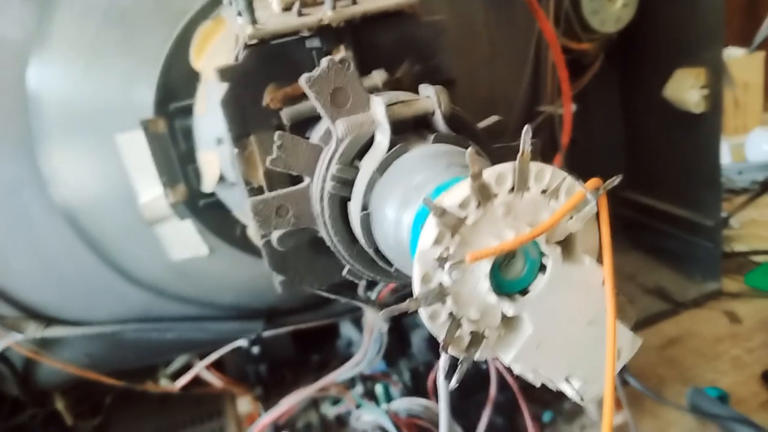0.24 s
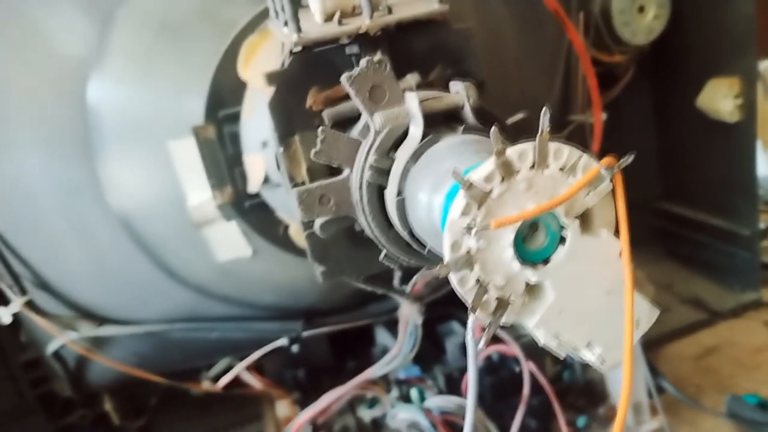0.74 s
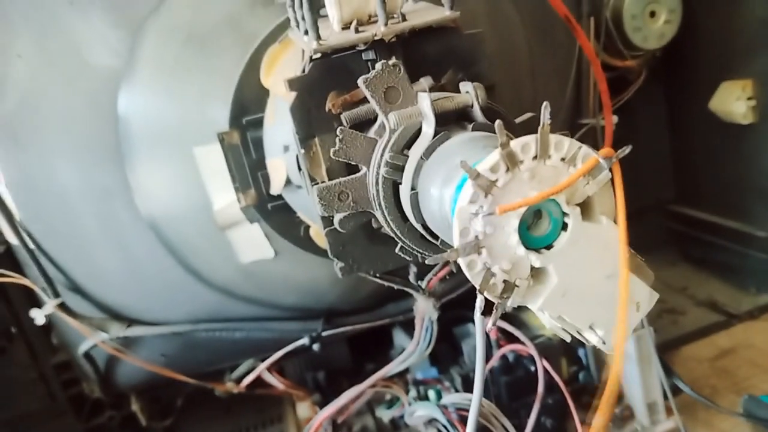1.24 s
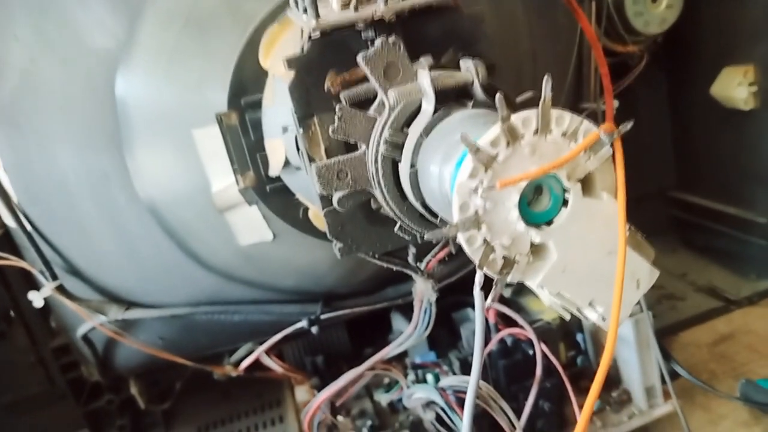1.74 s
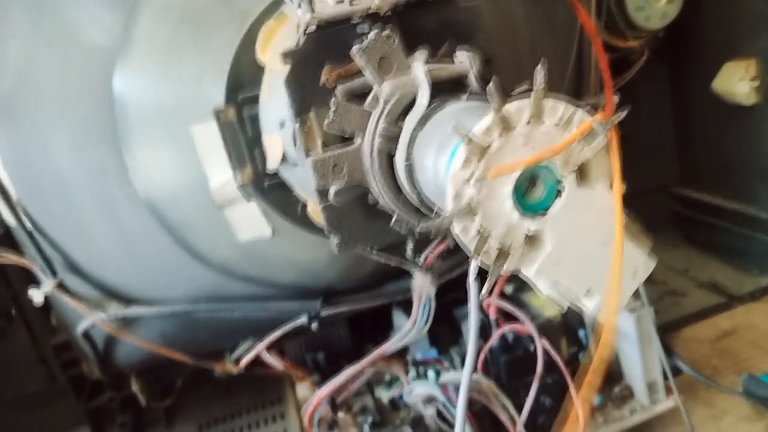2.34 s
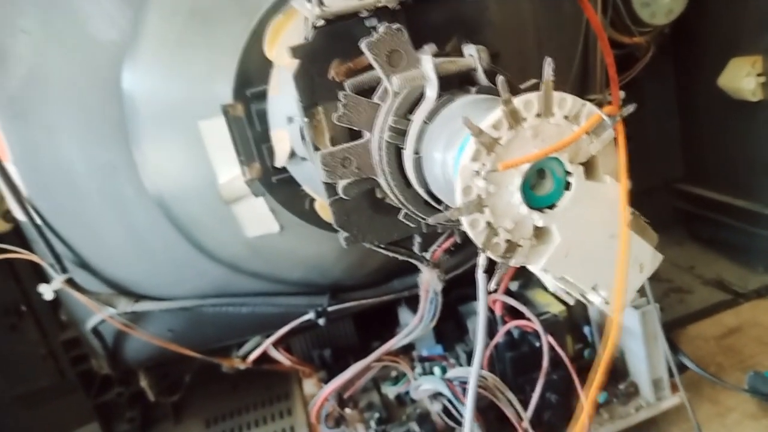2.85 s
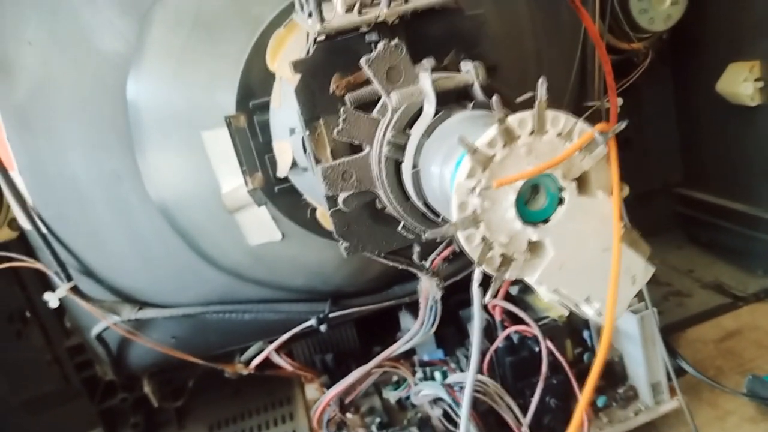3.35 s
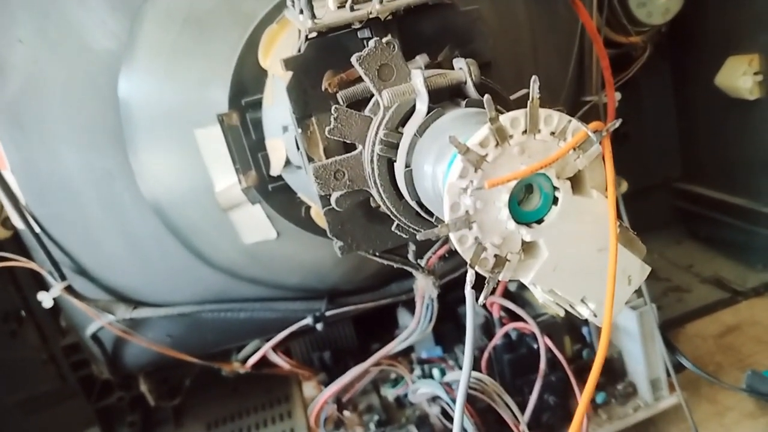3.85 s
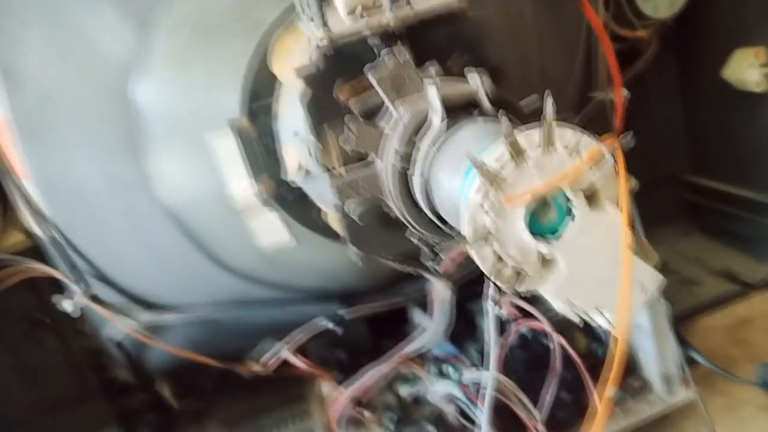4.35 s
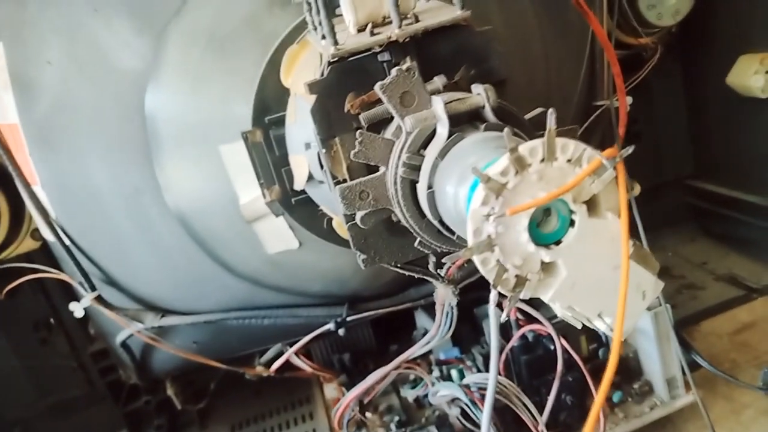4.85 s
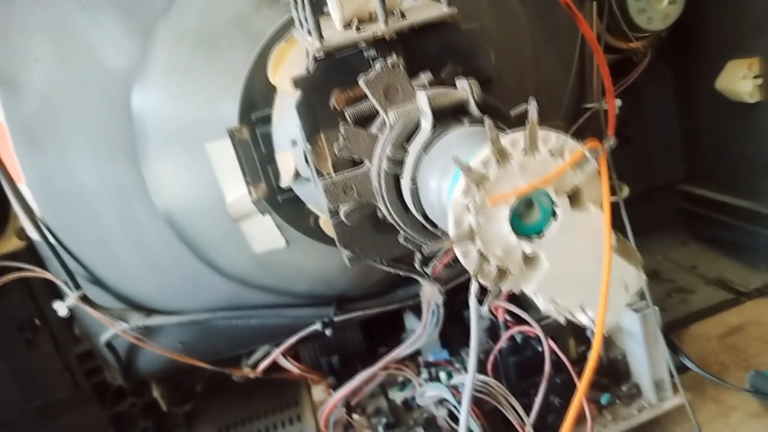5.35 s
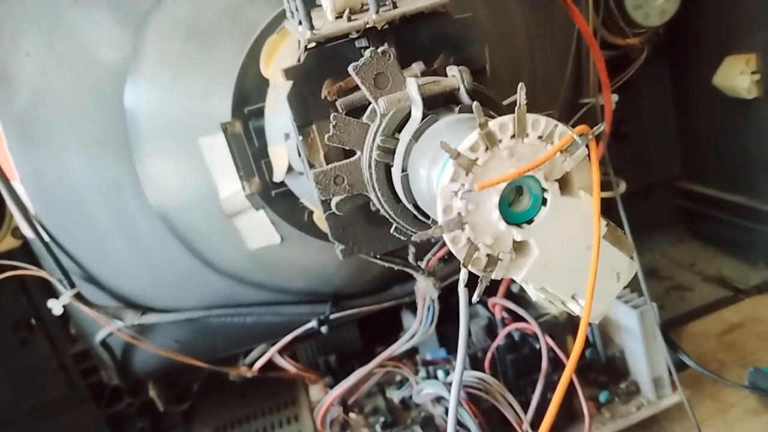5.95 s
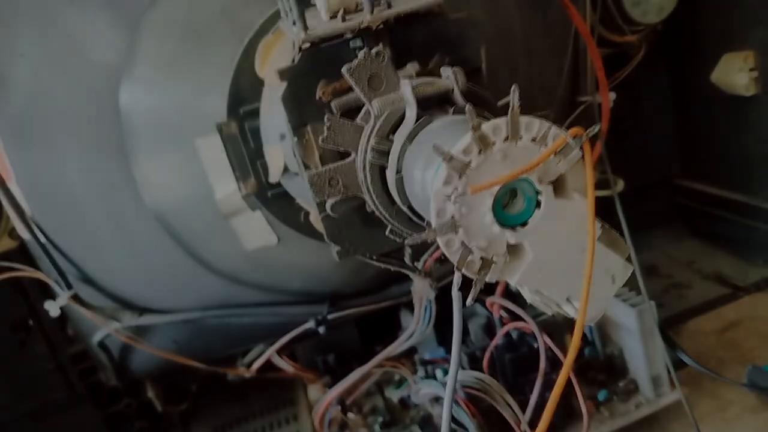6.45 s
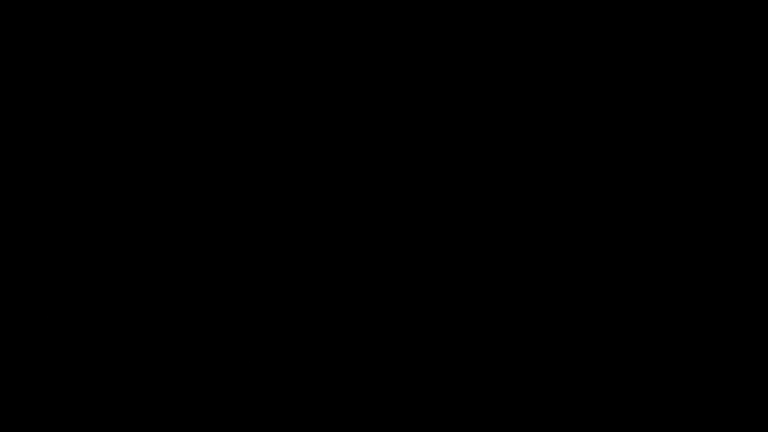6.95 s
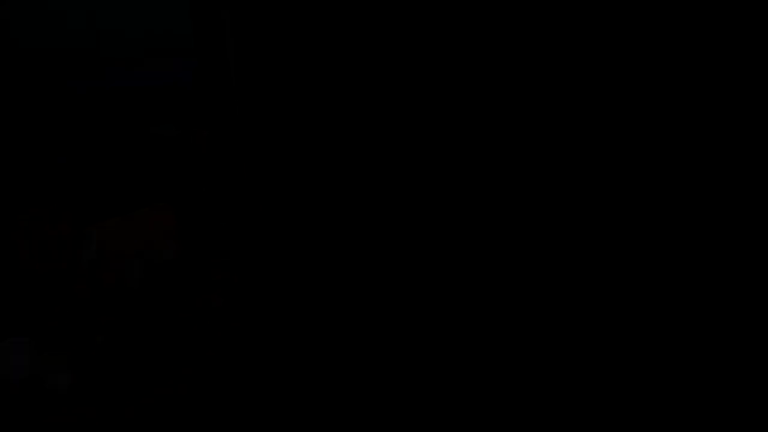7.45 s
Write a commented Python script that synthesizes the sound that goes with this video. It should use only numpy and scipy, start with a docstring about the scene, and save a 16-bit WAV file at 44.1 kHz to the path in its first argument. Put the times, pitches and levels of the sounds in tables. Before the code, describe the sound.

Sharp, loud electric sparks snap about seven times a second in a small workshop, pausing twice for switch clicks, then fade out.

```python
"""Sharp electric snaps, about seven a second, close to a phone: an electric fly swatter sparks at a picture tube's neck.
Each spark cracks in the tube socket with a dull pop of heated air, scatters off the chassis and dies away in a small
workshop; its discharge also jolts the microphone input into a low thump. Twice the swatter's button is let go and
pressed again. Soft bumps, a faint falling whistle, room noise and steady sines lie beneath. The end fades out."""
import sys
import numpy as np
from scipy import signal
from scipy.fft import rfft, irfft, next_fast_len
from scipy.io import wavfile

SR = 44100
rng = np.random.default_rng(int(sys.argv[2]) if len(sys.argv) > 2 else 0)


def inscribe(sig):
    """Save sig as 16-bit PCM at rate SR to the path in sys.argv[1].

    A 1-D sig is mono; a 2-D sig holds one channel per row.
    Samples are clipped to [-1, 1] before scaling.
    """
    pcm = np.round(np.clip(np.atleast_2d(sig).T, -1, 1) * 32767)
    wavfile.write(sys.argv[1], SR, pcm.astype(np.int16))


N = 339570  # length in samples

# The sparks. Each row: start in seconds, crack level in dB, level of the heated air's pop in dB,
# signed size of the electrical jolt to the microphone input (no unit).
SPARKS = [(0.1012, 0.7, 19, -0.045), (0.2566, .6, 16.5, 0.57), (0.3714, 0.2, 20, -.05),
          (0.5193, 1.3, 20.5, -.18), (0.6331, 1, 19.5, -.13), (0.768, -0.5, 13.5, -.11),
          (.9, 0.5, 15, -0.046), (1.2918, .7, 14, 0.029), (1.4148, 2.4, 8.5, 0.076),
          (1.5385, 1, 14.5, -0.066), (1.678, 2, 20.5, -.02), (1.82, 2.5, 22.5, 0.11),
          (1.9675, 0.7, 19, -.06), (2.1025, 0.9, 16, -0.05), (2.2306, -0.3, 6.5, -.02),
          (2.8287, 1, 16, -0.044), (2.9819, 1.5, 12.5, .03), (3.106, 0.8, -15.5, .36),
          (3.2143, -1, 10, -.01), (3.3447, -0.8, 12, -.06), (3.4871, 1, 19, -0.097),
          (3.635, -1.4, 16, -0.36), (3.7939, 0, 9, .11), (3.9093, 0.4, 14.5, -.07), (4.0674, 0, 7, .26),
          (4.2175, 0.1, -20, 0.029), (4.3394, 1.3, 17.5, .99), (4.4765, -1.2, 11, -.15),
          (4.6228, 1.3, 18.5, -.22), (4.7544, -1.8, 5, -0.052), (4.896, 0.5, 18, 0.091),
          (5.0434, 1.8, 11, 0.3), (5.2112, 1.6, 7, -.07), (5.3541, 2, 16.5, .33), (5.508, -0.5, 11.5, -.18),
          (5.6421, -0.7, 14.5, -0.42), (5.8186, 0.2, 10, .43), (5.9883, 0.5, 20, -0.55),
          (6.1571, -.3, 12.5, .64), (6.3038, 1, 19.5, -.33), (6.488, -1.1, 12, .41),
          (6.6863, 0.5, 12.5, 0.54), (6.8611, 0.5, 10.5, -.16), (7.0634, 1, -2, 0.22)]


def amp(db):
    """Turn decibels into a gain."""
    return 10 ** (np.asarray(db) / 20)


def unit(x):
    """Scale a sound to rms 1."""
    return x / np.sqrt(np.mean(x ** 2) + 1e-20)


def along(points, hz):
    """Read a curve of (Hz, value) points on a logarithmic frequency axis."""
    f, v = np.transpose(points)
    return np.interp(np.log(hz + 1), np.log(f + 1), v)


def filtered(x, response):
    """Multiply the spectrum of x by a (possibly complex) response of frequency."""
    m = next_fast_len(len(x) + 8192)  # spare room so that ringing does not wrap around
    f = np.fft.rfftfreq(m, 1 / SR)
    return irfft(rfft(x, m) * response(f), m)[:len(x)]


def resonance(f, hz, width_hz):
    """A ringing band-pass that starts no earlier than its input, with gain 1 at its centre."""
    return 1j * f * width_hz / (hz * hz - f * f + 1j * f * width_hz)


def causal(gain):
    """The tightest ringing response that has this gain per frequency: sharp attack, then decay."""
    cepstrum = irfft(np.log(gain + 1e-6))
    half = len(cepstrum) // 2
    # folding the second half onto the first gives the minimum-phase response
    fold = np.r_[1, np.full(half - 1, 2), 1, np.zeros(half - 1)]
    return irfft(np.exp(rfft(cepstrum * fold)))[:half]


def add(track, s, sound):
    """Mix a sound into the track at time s, in seconds."""
    part = track[round(s * SR):][:len(sound)]
    part += sound[:len(part)]


def impulses(times, sizes):
    """One single-sample impulse per event."""
    return np.bincount(np.round(times * SR).astype(int), sizes, N)[:N]


def sparks():
    """The direct sound: a ringing crack, a dull pop, and the thump of a voltage step of either sign."""
    s, _, pop_db, jolt = np.transpose(SPARKS)

    def pop_colour(f):
        return resonance(f, 850, 1600) / (1 + (f / 2000) ** 4)

    def input_coupling(f):
        # turns a voltage step into one slow swing
        swing = amp(41.0) * resonance(f, 99, 136)
        return swing / (1 + (f / 2300) ** 4) / (1 + 1j * f / 2860)

    pop = filtered(impulses(s, amp(pop_db)), pop_colour)
    thump = filtered(impulses(s, jolt), input_coupling)
    return cracks() + pop + thump


def cracks(bite_db=1, bite_hz=4000, bite_width_hz=4000):
    """The shock front of each spark rings the socket for a millisecond or two; the more pop, the less low ring."""
    # How strongly the low resonances sound as the hand-held phone moves.
    # Each row: time in seconds, level in dB before the pop takes its share.
    low_ring = [(.3, 2.4), (.85, 2.9), (1.3, 6), (2.1, 3), (3, 3.5), (3.3, 0.8), (3.7, 4), (4.7, 1.5),
                (5.1, 5), (6.9, 4)]
    low_loss_db, full_pop_db = 5, 20.5  # a pop of full_pop_db takes low_loss_db from the low ring
    # the arc wanders among the pins, so the nearest face's reflection cuts different notches each time
    face_share, face_near_s, face_far_s = .2, .0003, .001
    out = np.zeros(N)
    f = np.fft.rfftfreq(2048, 1 / SR)
    for s, crack_db, pop_db, _ in SPARKS:
        low_db = np.interp(s, *np.transpose(low_ring)) - low_loss_db * amp(pop_db - full_pop_db)
        ring_power = socket(f, low_db, vary_db=1.0)
        # a broad bite of sound under the narrow resonances
        bite_power = np.abs(amp(bite_db + low_db) * resonance(f, bite_hz, bite_width_hz)) ** 2
        face_delay_s = rng.uniform(face_near_s, face_far_s)
        face = face_share / (1 + (f / 6000) ** 4) * np.exp(-2j * np.pi * f * face_delay_s)
        gain = np.sqrt(ring_power + bite_power) * np.abs(1 + face)
        add(out, s, -amp(crack_db) * causal(gain))
    return out


def socket(f, low_db, vary_db):
    """Power gain of the cavities around the gap; each arc takes a new path and strikes them differently."""
    # Resonances that colour every crack. Each row: centre in Hz, width in Hz,
    # level in dB before the strike and low-ring changes.
    cavities = [(2285, 150, 5.5), (2988, 158, 13.5), (3767, 93, 16), (4020, 120, 11), (5320, 140, 13),
                (5763, 170, 19.5), (6200, 110, 16.5), (6480, 69, 17.5), (6980, 510, 12.5), (7838, 422, 23),
                (8500, 140, 14.5), (8300, 120, 4), (9220, 240, 8.5), (11160, 250, 8), (13200, 84, 3.5),
                (15150, 310, 16), (16800, 260, 14.5), (15200, 250, 3)]
    strikes_db = rng.normal(0, vary_db, len(cavities))
    power = 0
    for (hz, width_hz, db), strike_db in zip(cavities, strikes_db):
        level_db = db + strike_db + low_db * (hz < 5000)
        power = power + np.abs(amp(level_db) * resonance(f, hz, width_hz)) ** 2
    return power


def spark_echoes(chassis_db=3.5, slap_db=-5, room_db=3.0, drift=0.63, earlier_s=0.04):
    """Chassis and walls answer each spark; the pattern varies around a usual one as the hand-held phone moves."""
    # How well the chassis returns each note. Each row: frequency in Hz, gain in dB.
    chassis_colour = [(100, -16.5), (500, -10.5), (2000, -1.5), (3000, -5.5), (4000, 4), (6000, -9.5),
                      (7800, 8.5), (10000, -3), (12500, -1), (15000, 2), (16000, -10)]
    # How well the room returns each note. Each row: frequency in Hz, gain in dB.
    room_colour = [(80, -12.5), (300, -16.5), (1000, -12), (2300, -10.5), (3000, -5), (3900, -0.5),
                   (5000, -2), (6500, -5.5), (7900, 0), (9000, -4), (10000, -8), (12000, -10.5),
                   (14000, -3), (15400, -3)]
    # Distinct slaps from bench and nearest walls. Each row: average delay in seconds, relative level in dB.
    walls = [(.0058, -13), (.009, -5.5), (0.021, -12), (0.024, -12.5)]
    wall_sway_s = 0.00044  # typical random change of a slap's delay, as the phone sways

    def chassis():
        return scatter(t60=0.017, rise=0.0014)

    near, far = np.zeros(N), np.zeros(N)
    usual_near, usual_far = chassis(), room_tail()
    slaps = [scatter(t60=.004, rise=.0001) for _ in walls]
    add(far, 0, room_tail()[round(earlier_s * SR):])  # the room still rings from an earlier spark
    for s, crack_db, *_ in SPARKS:
        # cosine and sine shares keep the energy steady while part of the pattern is new
        near_pattern = np.cos(drift) * usual_near + np.sin(drift) * chassis()
        far_pattern = np.cos(drift) * usual_far + np.sin(drift) * room_tail()
        add(near, s, amp(crack_db + chassis_db) * near_pattern)
        add(far, s, amp(crack_db + room_db) * far_pattern)
        for (delay_s, db), slap in zip(walls, slaps):
            slap_s = s + delay_s + wall_sway_s * rng.standard_normal()
            add(near, slap_s, amp(crack_db + slap_db + db) * slap)
    near = filtered(near, lambda f: amp(along(chassis_colour, f)))
    far = filtered(far, lambda f: amp(along(room_colour, f)))
    return near + far


def scatter(t60, rise):
    """A dense burst of reflections with energy 1; t60 (seconds to fall 60 dB) and rise are in seconds."""
    t = np.arange(SR // 10) / SR
    burst = rng.standard_normal(len(t)) * amp(-60 * t / t60) * (1 - np.exp(-t / rise))
    return burst / np.linalg.norm(burst)


def room_tail():
    """Reverberation with energy near 1 at each frequency; notes around 1 kHz last longest."""
    # Each row: frequency in Hz, time to fall by 60 dB in seconds.
    room_t60 = [(200, 0.25), (1000, 0.48), (4000, 0.28), (8000, 0.31), (15000, 0.24)]
    hz, t, z = signal.stft(rng.standard_normal(SR // 2), SR, nperseg=256)
    t60 = along(room_t60, hz)[:, None]
    even_energy = np.sqrt(2 * np.log(1000) / (t60 * SR))
    tail = signal.istft(z * amp(-60 * t / t60) * even_energy, SR, nperseg=256)[1]
    return tail * (1 - np.exp(-np.arange(len(tail)) / SR / 0.0017))  # soft start


def button(tick_wet_db=-9, ring_wet_db=-11):
    """The switch ticks and rings the hollow plastic handle; the room answers each with a diffuse wash."""
    # The button let go and pressed. Each row: start in seconds, tick level in dB, handle ring level in dB,
    # time for the tick to fall by 60 dB in seconds, frequency in Hz above which the tick is dulled.
    presses = [(0.9982, -30.5, -34.5, 0.055, 2760), (1.2365, -25, -19, 0.019, 7970),
               (2.257, -21, -38, 0.018, 7000), (2.290, -39.5, -46, 0.04, 2900),
               (2.675, -49, -62, .02, 6000), (2.6946, -24.5, -19.5, 0.025, 8000)]
    # Notes of the plastic handle. Each row: frequency in Hz, relative level in dB,
    # time to fall by 60 dB in seconds.
    handle = [(470, -14, 0.044), (948, -18, 0.07), (1500, 2.5, 0.024), (1620, -21.5, .14), (2390, -6, 0.04),
              (2730, -10, 0.011), (4300, -7.5, 0.012), (4650, -9, .025), (6240, -23.5, 0.013),
              (8260, -14.5, 0.021)]
    # Tone of the tick. Each row: frequency in Hz, relative level in dB.
    tick_tone = [(100, -15.5), (450, -5.5), (1000, 1.5), (2300, -1), (3300, -1.5), (4600, -4), (7000, -3),
                 (10000, -5.5), (16000, -22.5)]
    # Tone of the handle's ring as the walls return it. Each row: frequency in Hz, relative level in dB.
    wall_tone = [(150, -28), (450, -4.5), (1000, -8.5), (1600, -1.5), (2500, -4), (3400, -11), (4500, -9),
                 (7000, -18.5), (16000, -21.5)]
    out, t = np.zeros(N), np.arange(SR // 5) / SR

    def ring_colour(f):
        return amp(along(wall_tone, f))

    for s, tick_db, ring_db, tick_t60, dull_hz in presses:
        def tick_colour(f):
            return amp(along(tick_tone, f)) / (1 + (f / dull_hz) ** 4)

        noise = unit(filtered(rng.standard_normal(len(t)), tick_colour))
        tick = amp(tick_db - 60 * t / tick_t60) * noise
        ring = np.zeros(len(t))
        for k, (hz, db, t60) in enumerate(handle):
            # neighbouring notes start in opposite directions
            ring += (-1) ** k * amp(ring_db + db - 60 * t / t60) * np.sin(2 * np.pi * hz * t)
        voices = (tick, tick_colour, tick_wet_db), (ring, ring_colour, ring_wet_db)
        for sound, colour, wet_db in voices:
            wash = filtered(room_tail(), colour)
            add(out, s, sound)
            # the wash's energy is set relative to the direct sound's
            add(out, s, amp(wet_db) * np.linalg.norm(sound) * wash / np.linalg.norm(wash))
    return out


def bumps(swell_s=0.0092, width=0.37):
    """Hands and wires nudge the set: short dull puffs of noise, width being a share of the centre frequency."""
    # Soft handling bumps. Each row: start in seconds, centre in Hz, level in dB.
    nudges = [(0.404, 880, -46.5), (1.70, 257, -52.5), (1.849, 198.6, -50), (1.92, 100, -47.5),
              (1.991, 154, -47.5), (3.015, 110, -46.5), (3.556, 100, -43)]
    out, u = np.zeros(N), np.arange(SR // 5) / SR / swell_s
    for s, hz, db in nudges:
        noise = rng.standard_normal(len(u))
        puff = unit(filtered(noise, lambda f: resonance(f, hz, width * hz) ** 2))
        add(out, s, amp(db) * puff * u * np.exp(1 - u))  # loudest after swell_s
    return out


def whistle(start_s=2.485, length_s=0.062, from_hz=4700, to_hz=3000, db=-66):
    """A faint falling whistle in the pause: a sliding sine that swells and fades."""
    out, u = np.zeros(N), np.linspace(0, 1, round(length_s * SR))
    phase = 2 * np.pi * np.cumsum(from_hz * (to_hz / from_hz) ** u) / SR
    add(out, start_s, amp(db) * np.sin(np.pi * u) * np.sin(phase))
    return out


def workshop(air_db=-60):
    """The quiet workshop: faint shaped room noise, with steady sines: low hum and very faint high tones."""
    # Tone of the room noise. Each row: frequency in Hz, relative level in dB per Hz.
    air_tone = [(25, -31), (60, -14), (100, -11), (150, -15.5), (230, -13), (340, -20.5), (600, -15),
                (750, -20.5), (900, -13.5), (1200, -21.5), (2500, -29.5), (4100, -26), (6000, -38.5),
                (16000, -44)]
    # Steady sines: low hum and very faint high tones. Each row: frequency in Hz, rms level in dB.
    sine_lines = [(100, -60), (141, -68), (400, -72), (878, -78), (4400, -80), (7500, -89), (10212, -89)]
    air = unit(filtered(rng.standard_normal(N), lambda f: amp(along(air_tone, f))))
    t = np.arange(N) / SR
    sines = sum(amp(db) * unit(np.sin(2 * np.pi * hz * t)) for hz, db in sine_lines)
    return amp(air_db) * air + sines


def scene():
    """Everything at the one microphone."""
    return (sparks() + spark_echoes() + button() + bumps() + whistle() + workshop())[None]


def record(dry):
    """The phone's filters delay the low notes of each snap; peaks clip, the end fades, the band is limited."""
    # Output fader. Each row: time in seconds, gain.
    fader = [(6.551, 0.96), (7.172, 0.0023)]
    top_hz = 16100  # upper edge of the band

    def delay(f):
        # all-pass filters: they shift notes in time but leave their levels alone
        first = 1 - 2 * resonance(f, 401, 86)
        second = 1 - 2 * resonance(f, 360, 425)
        third = 1 - 2 * resonance(f, 1500, 1000)
        return first * second * third

    def low_cut(f):
        return f ** 4 / (f ** 4 + 67 ** 4)

    x = np.clip(filtered(dry[0], lambda f: delay(f) * low_cut(f)), -1, 1)
    x = x * np.interp(np.arange(N) / SR, *np.transpose(fader))
    return filtered(x, lambda f: 1 / (1 + (f / top_hz) ** 120))[None]


dry = scene()
out = record(dry)
inscribe(out)
```